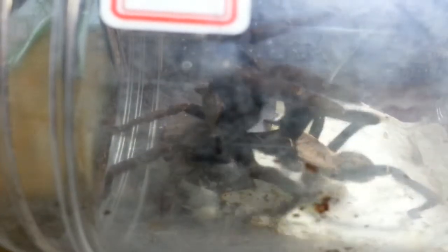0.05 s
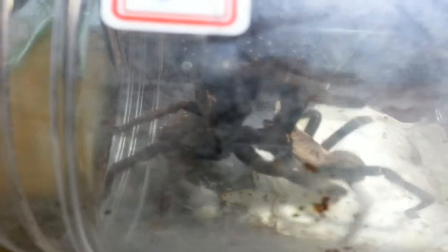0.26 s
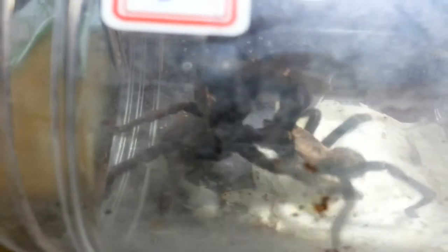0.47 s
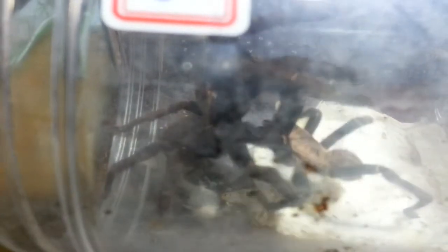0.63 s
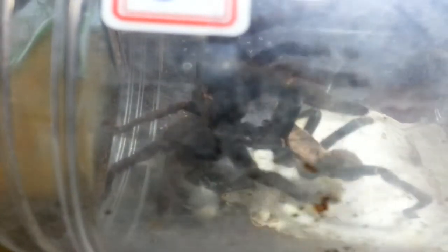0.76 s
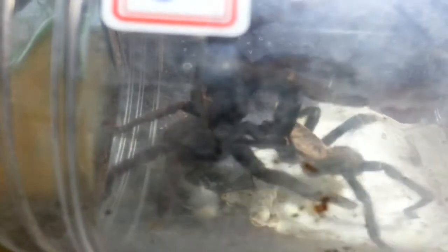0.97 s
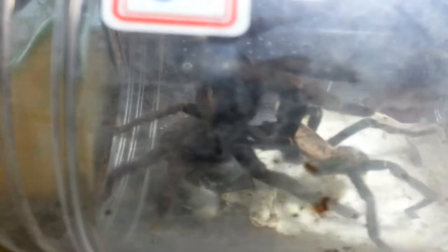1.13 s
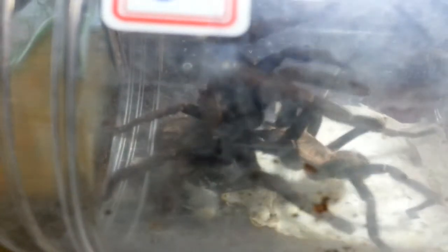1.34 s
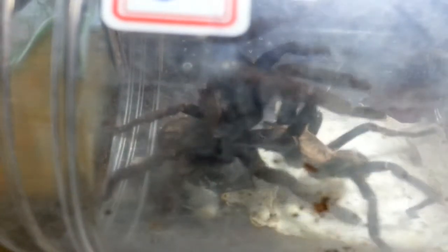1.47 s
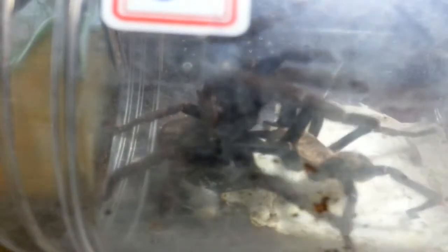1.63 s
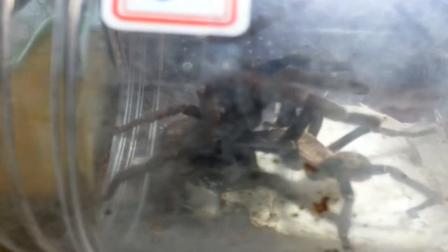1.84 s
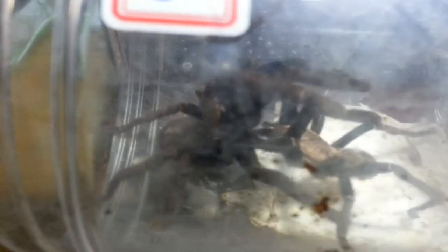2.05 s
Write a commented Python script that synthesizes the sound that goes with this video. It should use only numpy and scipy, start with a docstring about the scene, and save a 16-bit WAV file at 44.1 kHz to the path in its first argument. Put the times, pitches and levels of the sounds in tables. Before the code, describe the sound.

Faint scratching of spider legs on plastic, one dull thump, over quiet hum and hiss.

```python
"""A tarantula shifts about in a clear plastic tub, close to a small camera.
Mains hum, room rumble and soft hiss run throughout; the right microphone port rings in the treble.
From the start, hairy legs brush and flex the wall, and claws tick on the plastic.
Near 0.5 s a leg knocks twice and the tub gives one low thump.
Sparser strokes follow, with a last claw tick at 1.55 s."""
import sys
import numpy as np
from scipy.fft import rfft, irfft, next_fast_len
from scipy.io import wavfile
from scipy.ndimage import map_coordinates

SR = 44100
rng = np.random.default_rng(int(sys.argv[2]) if len(sys.argv) > 2 else 0)


def master(y):
    """Save y as 16-bit WAV."""
    cut = np.clip(np.atleast_2d(y).T, -1, 1)
    pcm = np.round(cut * 32767)  # scale
    wavfile.write(sys.argv[1], SR, pcm.astype(np.int16))


N = 92610
TOP_HZ = 14520
TICK_LEFT_DB = -35  # snags and claws, left re right


def amp(db):
    """Decibels to gain."""
    return 10 ** (np.asarray(db) / 20)


def unit(x):
    """Scale to rms 1."""
    return x / np.sqrt(np.mean(x ** 2) + 1e-20)


def filtered(x, response):
    """Apply the gain response(hz) to x."""
    size = next_fast_len(N + SR // 2)
    return irfft(rfft(x, size) * response(np.fft.rfftfreq(size, 1 / SR)), size)[..., :N]


def coloured(x, points):
    """Shape x by (frequency [Hz], gain [dB]) points on a log axis; cut at TOP_HZ."""
    points_hz, db = np.transpose(points)
    log_hz = np.log(points_hz + 1)
    return filtered(x, lambda hz: amp(np.interp(np.log(hz + 1), log_hz, db)) * (hz < TOP_HZ))


def wobble(rate_hz):
    """Smooth curve through random knots."""
    knots = rng.standard_normal(int(N * rate_hz / SR) + 4)
    return map_coordinates(knots, [np.arange(N) * rate_hz / SR])


def since(start_s):
    """Seconds since start_s, zero before it."""
    return np.maximum(np.arange(N) / SR - start_s, 0)


def hum():
    """A mains-driven appliance buzzes, its overtones loosely bunched into one pulse a cycle."""
    # (mains multiple, left level [dB], right level [dB])
    harmonics = [(1, -64, -58.5), (2, -55, -54.5), (3, -79, -67.5), (4, -66.5, -70), (6, -78.5, -67.5),
                 (7, -64.5, -97.5), (8, -78, -67.5), (9, -64.5, -64.5), (10, -76.5, -66), (11, -55.5, -65),
                 (12, -66.5, -65), (13, -57.5, -62.5), (14, -83, -75)]
    mains_hz, scatter_rad = 60, 0.67
    mains_rad = 2 * np.pi * (mains_hz * since(0) + rng.random())
    out = np.zeros((2, N))
    for multiple, left_db, right_db in harmonics:
        phase_rad = multiple * mains_rad + scatter_rad * rng.standard_normal()
        out += amp([[left_db], [right_db]]) * np.sqrt(2) * np.sin(phase_rad)
    return out


def room():
    """Low room noise, partly the same in both ports."""
    # rumble spectrum: (frequency [Hz], relative density [dB])
    spectrum = [(20, -12), (70, -15), (130, -0.5), (240, 3), (330, -2), (480, -5), (720, -6), (1000, -10.5),
                (2000, -14.5), (4000, -27.5)]
    left_db, right_db, shared_power = -57.5, -63.5, 0.42
    common = np.sqrt(shared_power) * rng.standard_normal(N)
    separate = np.sqrt(1 - shared_power) * rng.standard_normal((2, N))
    return unit(coloured(common + separate, spectrum)) * amp([[left_db], [right_db]])


def hiss(level_db=-54.5):
    """Soft, nearly white noise, independent in each port."""
    # hiss spectrum: (frequency [Hz], relative density [dB])
    spectrum = [(100, 0), (1000, 1.3), (2800, 0.31), (4400, 0.75), (7000, -0.71), (10000, -1.2),
                (14000, -1.3)]
    return amp(level_db) * unit(coloured(rng.standard_normal((2, N)), spectrum))


def right_port(x):
    """The right microphone port resonates near 7 kHz."""
    # port response: (frequency [Hz], gain [dB])
    response = [(100, 6.5), (1100, -5), (2100, -1.5), (2750, -5), (3400, -4), (5200, 2.5), (6200, 5),
                (6750, 12.5), (7300, 13.5), (7800, 6), (9000, -0.5), (10500, -0.5), (13000, 0.5),
                (14500, -3)]
    return coloured(x, response)


def leg_effort():
    """Stroke strength at each port: swell, hold, decay; overlaps add in power."""
    # leg strokes: (time [s], length [s], level [dB], right re left [dB])
    strokes = [(0.0, 0.013, -59, 3.5), (0.125, 0.021, -48, -0.5), (0.19, 0.03, -46.5, 0.5),
               (0.232, 0.028, -48, 1.5), (0.273, 0.066, -46.5, 0.5), (0.337, .062, -47.5, 3.5),
               (0.42, 0.024, -48.5, 6), (0.444, 0.026, -39.5, -0.5), (0.488, .048, -42, -1),
               (0.547, 0.034, -41, -1.5), (0.634, 0.03, -54, 1), (0.766, 0.026, -54, 1.5),
               (1.062, 0.036, -50.5, 0), (1.137, 0.041, -56, -0.5), (1.343, 0.03, -57.5, -1),
               (1.533, 0.022, -41, -0.5), (1.807, 0.022, -50.5, 0.5), (1.916, 0.046, -55.5, -0.5),
               (2.042, 0.026, -55.5, 2)]
    attack_s, t60_s = 0.01, 0.19
    power = np.zeros((2, N))
    for start_s, length_s, db, right_db in strokes:
        swell = np.minimum(since(start_s) / attack_s, 1)
        decay = amp(db - 60 * since(start_s + length_s) / t60_s)
        power += (swell * decay * amp([[0], [right_db]])) ** 2
    return np.sqrt(power)


def brushing(effort, rough_db=1.5):
    """Leg hairs slide over the plastic in a fine, slightly uneven rustle."""
    # hair on plastic: (frequency [Hz], relative density [dB])
    spectrum = [(40, 4), (150, 2.5), (400, 2.5), (720, 8.5), (1000, 0.5), (2000, 2.5), (3000, 1), (4700, 5),
                (8000, 1), (14000, 0)]
    rustle = unit(coloured(rng.standard_normal((2, N)), spectrum))
    return rustle * effort * amp(rough_db * wobble(rate_hz=120))


def snags(effort):
    """Hairs catch and let go at random, close to the right port."""
    rate_hz, gain_db, spread_db = 260, 14.5, 3.5
    catches = (rng.random(N) < rate_hz / SR) * rng.choice([-1, 1], N)
    strength = amp(gain_db + spread_db * rng.standard_normal(N))
    return catches * strength * effort * amp([[TICK_LEFT_DB], [0]])


def flexing(effort, gain_db=-7):
    """The wall flexes and murmurs under each stroke, alike in both ports."""
    # wall murmur: (frequency [Hz], relative density [dB])
    spectrum = [(20, -25), (55, -2), (110, 1), (240, -9.5), (400, -11.5), (650, -1.5), (850, -6),
                (1300, -23)]
    return amp(gain_db) * effort[0] * unit(coloured(rng.standard_normal(N), spectrum))


def claws():
    """A claw tip snaps on the wall: a millisecond of bright ringing, then a faint tail."""
    # claw ticks: (time [s], level [dB], pitch [Hz])
    ticks = [(.1327, -30, 7200), (0.2136, -24, 6600), (.2468, -26, 7100), (.2799, -22.5, 6800),
             (.3270, -22, 6760), (0.348, -24, 7070), (.3785, -24, 6900), (.4468, -18, 6950),
             (.4552, -13, 6880), (0.46, -29, 6800), (0.5135, -19.5, 6500), (1.547, -13.5, 7000)]
    rise_s, tail_db, tail_t60_s = 0.00036, -7.5, 0.0088
    out = np.zeros(N)
    for start_s, db, hz in ticks:
        t = since(start_s)
        rises = t / rise_s
        snap = (rises * np.exp(1 - rises)) ** 2
        tail = (1 - np.exp(-rises)) * amp(tail_db - 60 * t / tail_t60_s)
        out += amp(db) * np.hypot(snap, tail) * np.sin(2 * np.pi * hz * t)
    return out * amp([[TICK_LEFT_DB], [0]])


def knocks():
    """A leg bumps the wall; each bump gives a short, hollow note."""
    # leg bumps: (time [s], level [dB])
    bumps = [(.4492, -41), (0.5547, -28.5)]
    pitch_hz, rise_s, t60_s, right_db = 1778, 0.0011, 0.052, -7
    out = np.zeros(N)
    for start_s, db in bumps:
        t = since(start_s)
        envelope = (1 - np.exp(-t / rise_s)) * amp(db - 60 * t / t60_s)
        out += envelope * np.sin(2 * np.pi * pitch_hz * t)
    return out * amp([[0], [right_db]])


def thump(start_s=0.5572):
    """A soft blow rings the tub's low, damped modes and leaves a dull wash."""
    # tub modes: (frequency [Hz], left level [dB], right level [dB], rise [s], t60 [s])
    modes = [(63, -45, -39, .012, 0.43), (155.3, -16.5, -24.5, .002, 0.1), (199, -16, -22.5, 0.0025, 0.068),
             (291.5, -22, -40, 0.0052, 0.072), (356.4, -24, -7, 0.0086, 0.052),
             (526.3, -34.5, -32, 0.0033, 0.11), (641, -29, -41, 0.006, 0.088),
             (757, -27.5, -28, 0.003, .07)]
    # dull wash: (frequency [Hz], relative density [dB])
    wash_spectrum = [(30, -26), (90, -16), (130, 6.5), (200, 0), (400, -6), (550, -7), (750, -10),
                     (1100, -23), (2000, -12), (4000, -45)]
    wash_db, wash_rise_s, wash_t60_s = -34.5, 0.0046, 0.2
    t = since(start_s)
    ring = np.zeros((2, N))
    for hz, left_db, right_db, rise_s, t60_s in modes:
        envelope = (1 - np.exp(-t / rise_s)) ** 2 * amp(-60 * t / t60_s)
        ring += amp([[left_db], [right_db]]) * envelope * np.sin(2 * np.pi * hz * t)
    wash = unit(coloured(rng.standard_normal((2, N)), wash_spectrum))
    wash_envelope = (1 - np.exp(-t / wash_rise_s)) * amp(wash_db - 60 * t / wash_t60_s)
    return ring + wash * wash_envelope


def scene():
    """Stereo mix; only hiss, brushing and snags take the right port's colour."""
    effort = leg_effort()
    left, right = hiss() + brushing(effort) + snags(effort)
    rustle = np.array([left, right_port(right)])
    return rustle + flexing(effort) + claws() + knocks() + thump() + hum() + room()


def record(dry):
    """The camera keeps nothing above its band limit."""
    return filtered(dry, lambda hz: hz < TOP_HZ)


dry = scene()
out = record(dry)
master(out)
```